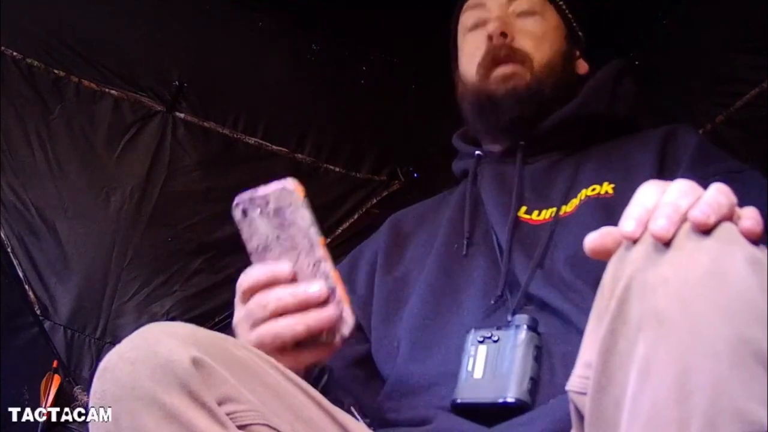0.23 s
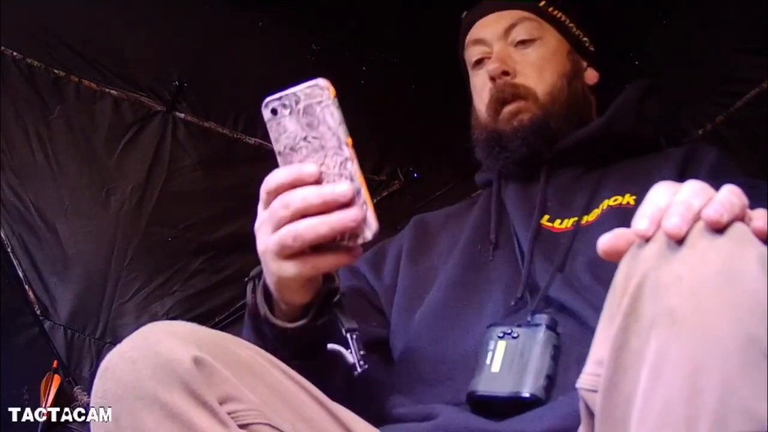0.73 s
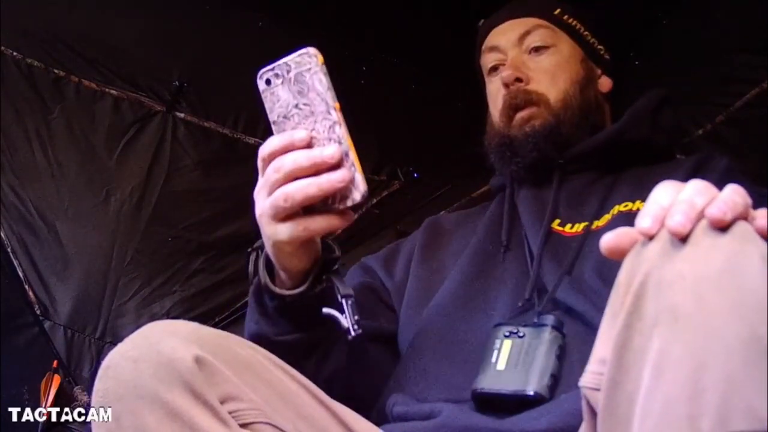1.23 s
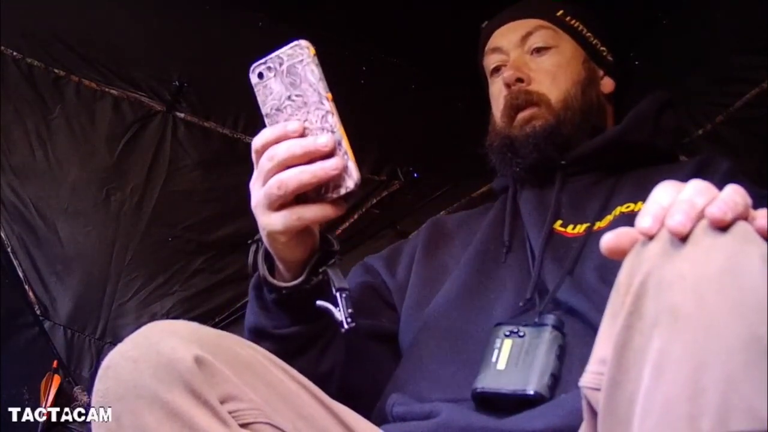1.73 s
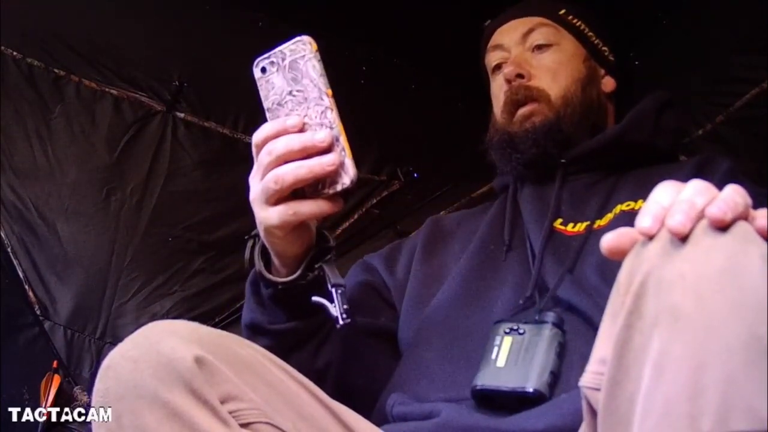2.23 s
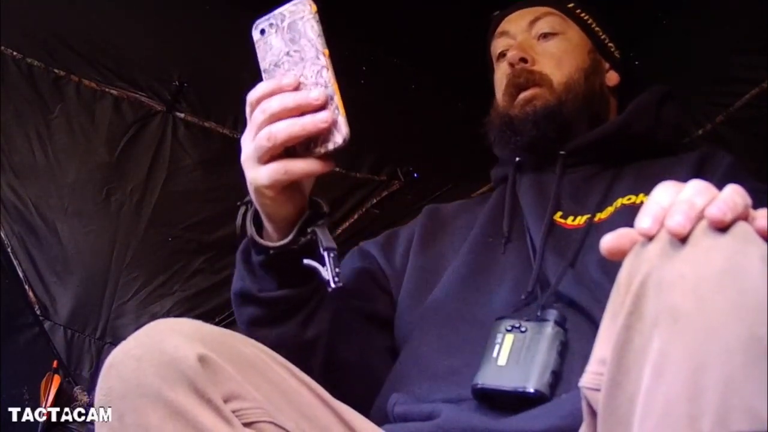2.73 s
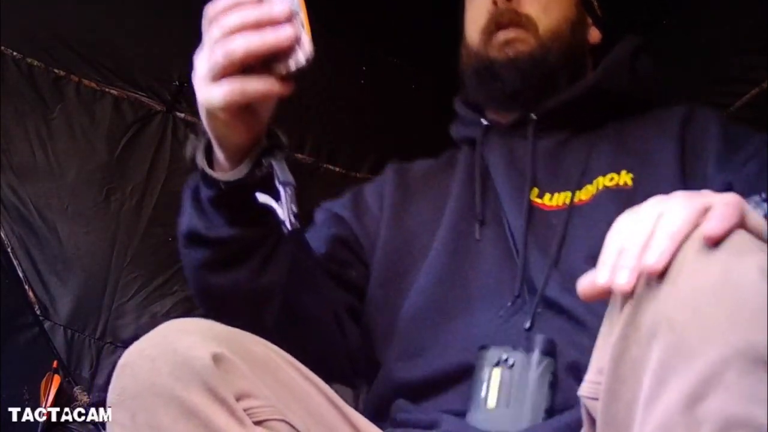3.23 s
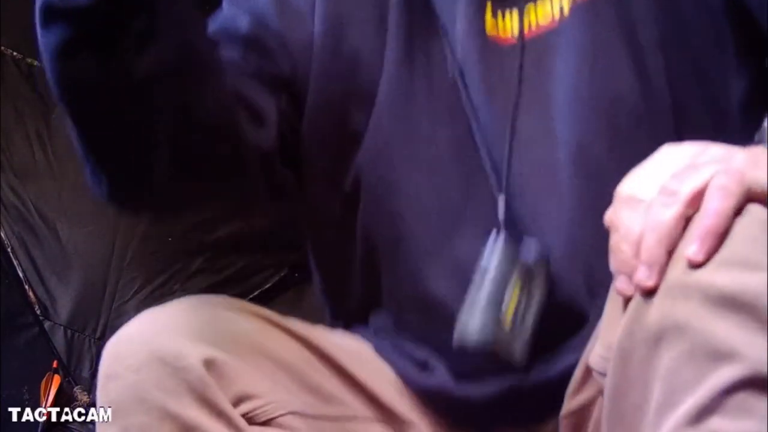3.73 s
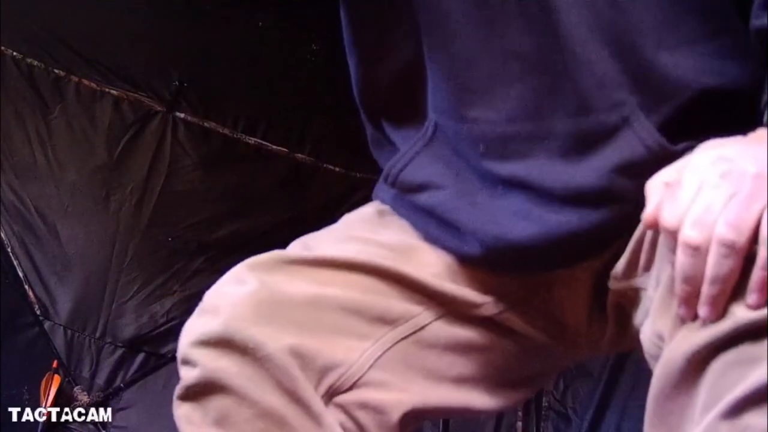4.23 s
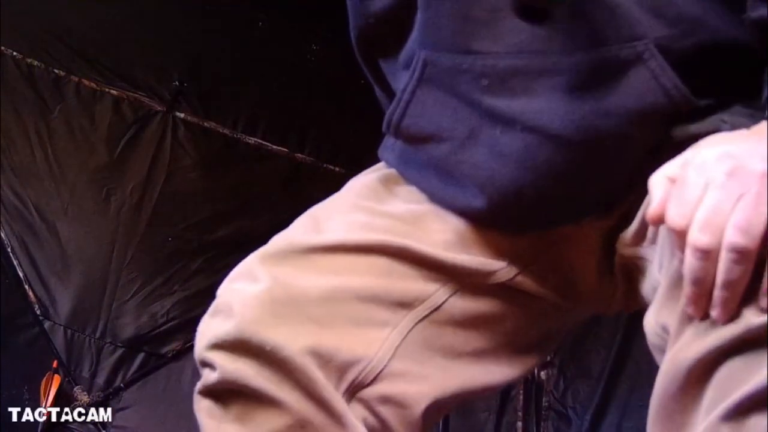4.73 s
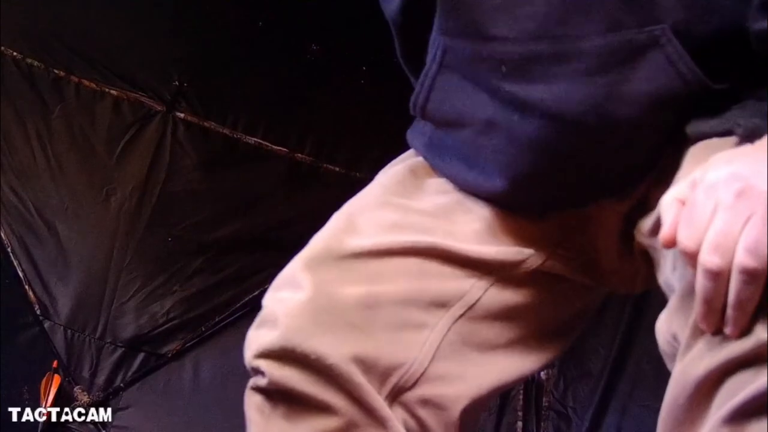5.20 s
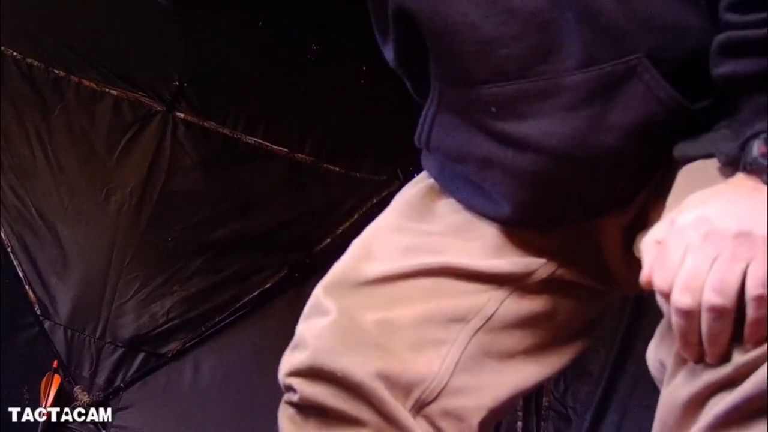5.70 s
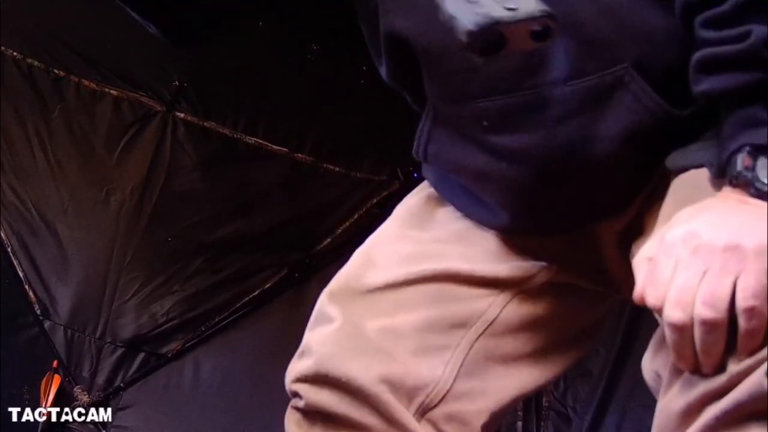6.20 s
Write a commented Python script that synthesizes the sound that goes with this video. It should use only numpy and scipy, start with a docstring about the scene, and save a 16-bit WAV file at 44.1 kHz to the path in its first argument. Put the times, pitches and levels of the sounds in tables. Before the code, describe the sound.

Soft low wingbeat thuds and feathery swishes come about four a second, then thin out, over low cloth rumble and faint hiss.

```python
"""Large bird flopping on the ground

A large bird flops some way off, heard from inside a cloth hunting blind.
Each wing beat mixes low pushes of air and quick feather flutters, made of short swings of pressure.
Shaped noise adds the rustle of leaves and plumage, the wind rumbling in the cloth and the microphone hiss.
A small metal part clicks once, made of a noise scrape and ringing tones; a far bird peeps in short tones.
Once, the sound fades out, skips back and repeats its last moment."""
import sys
import numpy as np
from scipy import signal
from scipy.fft import rfft, irfft, next_fast_len
from scipy.io import wavfile
from scipy.ndimage import uniform_filter1d, map_coordinates

SR = 44100
rng = np.random.default_rng(int(sys.argv[2]) if len(sys.argv) > 2 else 0)


def amp(db):
    return 10 ** (np.asarray(db, float) / 20)


def to_wav(s):
    """Save 16-bit WAV."""
    ch = np.atleast_2d(s).T  # columns
    pcm = np.round(np.clip(ch, -1, 1) * 32767)  # PCM
    wavfile.write(sys.argv[1], SR, pcm.astype(np.int16))


N = 284886  # length of the scene [samples]


def unit(x):
    """Scales a sound to an rms of 1."""
    return x / np.sqrt(np.mean(x ** 2) + 1e-20)


def wobble(rate):
    """A smooth random curve that takes a new random value rate times a second."""
    knots = rng.standard_normal(int(N * rate / SR) + 4)
    return map_coordinates(knots, [np.arange(N) * rate / SR])


def noise(spectrum, patchy_db, tilt_db=0):
    """Coloured noise of rms 1 with patches of random gain, tilted per octave about 3 kHz."""
    _, _, z = signal.stft(rng.standard_normal(N + 512), SR, nperseg=512)
    patches = uniform_filter1d(rng.standard_normal(z.shape), size=5, axis=0)
    patches = uniform_filter1d(patches, size=6, axis=1)
    patchy = signal.istft(z * amp(patchy_db * unit(patches)), nperseg=512)[1][:N]
    m = next_fast_len(N + 8192)
    hz = np.fft.rfftfreq(m, 1 / SR) + 1  # the 1 avoids log(0)
    table_hz, table_db = np.transpose(spectrum)
    colour_db = np.interp(np.log(hz), np.log(table_hz), table_db, left=-120)
    colour_db = colour_db + tilt_db * np.log2(hz / 3000)
    return unit(irfft(rfft(patchy, m) * amp(colour_db), m)[:N])


def swings(rows, glide, rough, edge):
    """Short swings of pressure whose pitch glides and wanders; also returns their joint power outline."""
    out, outline = np.zeros(N + SR), np.zeros(N + SR)
    t = np.arange(-SR // 4, SR // 4) / SR
    luck = rng.standard_normal((len(rows), 3))
    for (centre_s, db, hz, ms), (phase, drift, wander) in zip(rows, luck):
        u = t / (ms / 2000)  # -1 and 1 where the bell is at half height
        bell = amp(db) * 0.5 ** (np.abs(u) ** edge)
        turns = hz * t * (1 + glide * np.tanh(u / 2))
        turns = turns + rough * wander * np.sin(2 * u + 2 * drift)
        start = round(centre_s * SR)
        # a swing tends to peak as a push, with suction before and after
        out[start:][:len(t)] += bell * np.cos(2 * np.pi * turns + 0.55 * phase)
        outline[start:][:len(t)] += bell ** 2
    # each swing was placed a quarter second late, to leave room before its centre
    return out[SR // 4:][:N], outline[SR // 4:][:N]


# How the background rises and falls:
# (time [s], rumble level [dB], stirred leaves level before a 4 dB cut [dB])
BACKGROUND = [(0.0, -43, -55.5), (0.6, -42.5, -61.5), (1.3, -43.5, -58.5), (1.75, -42.5, -54),
              (2.32, -42, -60.5), (2.9, -41, -50), (3.74, -42, -50), (4.21, -43.5, -58.5),
              (4.89, -42, -54.5), (5.22, -44.5, -59.5), (6.3, -41, -51.5), (6.46, -42.5, -53.5)]
# Colours of the wind rumble, the stirred leaves and the hiss:
# (frequency [Hz], relative level per hertz [dB])
RUMBLE_COLOUR = [(15, -37), (25, 1), (65, 1), (150, -3.5), (310, -9), (430, -16.5), (600, -21.5),
                 (1000, -28.5), (2000, -69)]
LEAVES_COLOUR = [(300, -14), (600, 6.5), (850, -8), (1250, 3), (1700, -4), (2300, 0), (5000, -9.5),
                 (8000, -17), (16000, -50)]
HISS_COLOUR = [(300, -12), (1000, -1.5), (1650, -5.5), (2400, -7), (4300, -8.5), (11000, -7), (16000, -8.5)]


def background():
    """Lumpy wind rumble in the cloth, leaves stirring and microphone hiss at an even level."""
    s, rumble_db, leaves_db = np.transpose(BACKGROUND)
    t = np.arange(N) / SR
    lumps_db = 0.8 * wobble(9) + 1.4 * wobble(40)
    rumble = amp(np.interp(t, s, rumble_db) + lumps_db) * noise(RUMBLE_COLOUR, patchy_db=0.6)
    stir_db = np.interp(t, s, leaves_db) - 4 + 0.7 * wobble(17)
    leaves = amp(stir_db) * noise(LEAVES_COLOUR, patchy_db=2.0)
    hiss = amp(-58) * noise(HISS_COLOUR, patchy_db=2.0)
    return rumble + leaves + hiss


# Far peeps and faint whistles:
# (time of centre [s], level of the bell's top [dB], base pitch [Hz], length at half height [ms])
PEEP_TONES = [(0.716, -56, 1995, 40), (1.0, -55, 2010, 10), (3.52, -62, 1380, 280), (3.45, -65, 3380, 260)]


def peeps():
    """A far bird's peeps and faint whistles: short tones that swell and fade, their pitch wandering."""
    return swings(PEEP_TONES, glide=0.001, rough=0.12, edge=2.5)[0]


# Tones of the metal part: (frequency [Hz], relative level [dB], time to fall by 60 dB [s])
METAL_TONES = [(2440, 0, .014), (5136, -1, .018), (6480, -3, .018), (8263, 0, .045), (9028, -7, .03),
               (11080, -8, .03)]
# When it clicks: (time [s], level shared by scrape and ring before their own gains [dB])
CLICK_MOMENT = (3.298, -37)


def click():
    """A short noise scrape sets a small metal part ringing in dying tones."""
    s, db = CLICK_MOMENT
    t = np.arange(SR // 5) / SR
    scrape_shape = (t / 0.0083) * (np.exp(-(t / 0.0093) ** 3) + 0.079 * np.exp(-t / 0.016))
    scrape = rng.standard_normal(len(t)) * scrape_shape
    tones = sum(amp(level - 60 * t / t60) * np.sin(2 * np.pi * hz * t) for hz, level, t60 in METAL_TONES)
    ring = signal.fftconvolve(scrape, tones)[:len(t)]
    band = signal.butter(3, [1900, 10000], "bandpass", fs=SR, output="sos")
    bare_scrape = signal.sosfilt(band, scrape)
    out = np.zeros(N)
    out[round(s * SR):][:len(t)] = amp(db) * (amp(-21.0) * ring + amp(12.5) * bare_scrape)
    return out


# Colour of leaves and plumage before tilting: (frequency [Hz], relative level per hertz [dB])
PLUMAGE_COLOUR = [(350, -24), (600, -8.5), (850, -7), (1250, -0.5), (1750, -5.5), (2400, 1), (5000, -5),
                  (8000, -13.5), (16000, -31.5)]
# Feather flutters, played by beat_rows() below, each with the rustle that follows it:
# (time of flutter centre [s], level of its bell's top [dB], base pitch [Hz], length at half height [ms],
#  rustle level before shaping and a 7.5 dB cut [dB], time for the rustle's fast fall by 60 dB [s])
FLUTTERS = [(.179, -34.5, 278, 9.7, -62.5, .15), (.303, -30.5, 233, 10, -57.5, .15),
            (.482, -37, 205, 7.4, -56, .1), (.51, -14.5, 228, 8.7, -47.5, 0.17),
            (.561, -28.5, 267, 16.5, -49.5, 0.26), (.811, -18, 277.6, 13.1, -44.5, 0.13),
            (1.066, -30.5, 240, 12.6, -53.5, 0.18), (1.108, -22.5, 301, 10.7, -46, 0.071),
            (1.371, -31.5, 292, 11, -47.5, 0.1), (1.424, -25.5, 269, 13.7, -46, .24),
            (1.628, -31, 218, 9.5, -62, .15), (1.685, -25.5, 308, 10, -46, 0.21),
            (1.937, -18.5, 228, 18.8, -45, 0.16), (2.226, -21, 268, 7.1, -52, 0.17),
            (2.256, -28.5, 298, 14, -53, .12), (2.476, -30.5, 300, 15, -48.5, .09),
            (2.539, -23.5, 300, 9.2, -50.5, .17), (2.765, -22, 265, 13.4, -53, .15),
            (2.792, -20.5, 299, 11.2, -41.5, 0.24), (3.038, -16, 264, 12.6, -41.5, 0.12),
            (3.266, -31, 250, 8.6, -46.5, 0.31), (3.339, -21.5, 318, 13.5, -46, 0.28),
            (3.583, -25, 230, 9.5, -53, 0.15), (3.602, -20.5, 262, 11, -41.5, 0.31),
            (3.807, -27.5, 287, 12, -53.5, 0.19), (3.866, -25.5, 270, 11.06, -51.5, 0.16),
            (4.173, -33, 276, 12.7, -55, 0.16), (4.401, -35, 243, 8.3, -65, .15),
            (4.426, -20, 290, 10, -52.5, 0.18), (4.486, -31, 225, 11, -56.5, .15),
            (4.707, -23, 260, 12.2, -55, .15), (4.754, -21.5, 336, 10.4, -43, 0.12),
            (4.983, -17, 295, 14.2, -41, .08), (5.234, -34.5, 304, 8, -66, .15),
            (5.656, -33.5, 295, 8.8, -51, 0.089), (6.01, -26, 263, 12.4, -48.5, 0.3),
            (6.066, -30, 298, 13, -50.5, 0.15), (6.322, -27, 230, 18.7, -48.5, .28)]


def rustle():
    """Leaves and plumage: a faint lead-in, a sharp swell, a short hold, a fast fall and a slower settling."""
    lag_s = 0.011  # behind the flutter
    t = np.arange(N) / SR
    dull_power, bright_power = np.zeros(N), np.zeros(N)
    luck = rng.standard_normal(len(FLUTTERS))
    for (flutter_s, *_, db, t60), chance in zip(FLUTTERS, luck):
        s = flutter_s + lag_s
        # louder rustles are brighter, with some scatter
        bright_db = -1 + 0.06 * (db + 48) + 1.3 * chance
        age = np.abs(t - s)
        held = np.sqrt(age ** 2 + 0.008 ** 2) - 0.008  # rounds off the start of the fall
        fall = amp(-60 * held / abs(t60)) + amp(-5) * amp(-60 * age / 0.91)
        rise = 1.1 * np.exp(-(age / 0.018) ** 3) + 0.54 * np.exp(-age / 0.05)
        power = (amp(db) * np.where(t > s, fall, rise)) ** 2
        # these are powers, so decibels count double inside amp()
        dull_power += power * amp(-2 * bright_db)
        # the treble dies sooner
        bright_power += power * amp(2 * bright_db + 2.5 - 120 * age * (t > s) / 1.34)
    # single feathers and leaves crackle inside the swish
    crackle = amp(0.3 * wobble(90) + 1.5 * wobble(450))
    dull = np.sqrt(dull_power) * noise(PLUMAGE_COLOUR, patchy_db=2.0, tilt_db=-5.0)
    bright = np.sqrt(bright_power) * noise(PLUMAGE_COLOUR, patchy_db=2.0, tilt_db=4.0)
    return crackle * (dull + bright) * amp(-7.5)


# Low pushes of air from the downstroke:
# (time of centre [s], level of the bell's top [dB], base pitch [Hz])
AIR_PUSHES = [(0.483, -38, 104), (.513, -12, 127), (0.814, -16.5, 124), (1.067, -30, 82), (1.102, -25, 131),
              (1.37, -23.5, 96), (1.616, -28, 144), (1.929, -29, 115), (2.229, -25.5, 139),
              (2.478, -26, 90), (2.532, -25, 141), (2.768, -16.5, 102), (2.792, -23.5, 95),
              (3.038, -16.5, 104), (3.272, -23, 122), (3.571, -23.5, 111), (3.6, -28, 95), (3.82, -26, 91),
              (3.864, -28, 95), (4.403, -25, 113), (4.416, -21, 92), (4.71, -17, 89.5), (4.751, -25, 111),
              (4.985, -12, 110), (6.007, -23, 108), (6.068, -29.5, 129), (6.323, -27, 131)]


def beat_rows():
    """Lists the air pushes, the flutters and a loose feather's slap near each flutter, for swings()."""
    push_cycles = 1.26  # length of a push at half height
    push_s, push_db, push_hz = np.transpose(AIR_PUSHES)
    pushes = [push_s, push_db, push_hz, push_cycles / push_hz * 1000]
    s, db, hz, ms = np.transpose(FLUTTERS)[:4]
    luck = rng.standard_normal((2, len(s)))
    # the slap usually comes about 0.8 flutter lengths early; it is shorter and lower in pitch
    slap_s = s + (0.15 * luck[0] - 0.8) * ms / 1000
    slap_db = db - 3.5 + 2 * luck[1]
    slaps = [slap_s, slap_db, 0.75 * hz, 0.49 * ms]
    return np.hstack([pushes, [s, db, hz, ms], slaps]).T


# Colours of the churned air and the slow heave: (frequency [Hz], relative level per hertz [dB])
CHURN_COLOUR = [(20, 6), (45, -5.5), (180, 6), (420, -2), (560, -15), (750, -35.5), (1200, -62)]
HEAVE_COLOUR = [(15, -3), (30, 9), (70, 5.5), (110, -11), (200, -47)]


def wings():
    """Wing beats press on the air, churn it and heave it slowly; ground and trees answer dully."""
    beats, outline = swings(beat_rows(), glide=0.11, rough=0.13, edge=2.4)
    churn = amp(-8.0) * np.sqrt(outline) * noise(CHURN_COLOUR, patchy_db=-1.1)
    # smoothing spreads the heave over the whole stroke
    stroke = np.abs(uniform_filter1d(uniform_filter1d(outline, size=900), size=900))
    heave = amp(-13.0) * np.sqrt(stroke) * noise(HEAVE_COLOUR, patchy_db=3.5)
    direct = beats + churn + heave
    t = np.arange(SR // 3) / SR
    # the answer is a dying noise tail that starts after 8 ms
    tail = rng.standard_normal(len(t)) * amp(-60 * t / 0.17) * (t > 0.008)
    answer = signal.fftconvolve(direct, tail / np.linalg.norm(tail))[:N]
    return direct + amp(-11.0) * answer


def scene():
    """Adds up everything that reaches the one microphone."""
    return (background() + peeps() + click() + rustle() + wings())[None]


# The skip back: (time [s], length heard twice [s], fade setting [s])
SKIP_BACK = (5.716, 0.13333, 0.026)


def skip(x):
    """The sound fades out, jumps back and plays its last moment again, then blends into what follows."""
    at, back, fade = (round(v * SR) for v in SKIP_BACK)
    k = np.arange(N)
    blend = np.pi / 2 * (k >= at) * np.clip((at + back - k) / fade, 0, 1)
    x = np.cos(blend) * x + np.sin(blend) * np.roll(x, back, axis=1)
    dip = (np.abs(k - at) / fade) ** 0.84 + 0.078 * (k >= at)
    return x * np.clip(dip, 0, 1)


def top_cut(x):
    """Nothing passes above the cut-off."""
    return signal.sosfilt(signal.butter(12, 16180, fs=SR, output="sos"), x)


def record(dry):
    """Skips back once and removes everything from 15.8 kHz up."""
    skipped = skip(dry)
    below_limit = np.fft.rfftfreq(N, 1 / SR) < 15800
    mix = irfft(rfft(skipped) * below_limit, N)
    return top_cut(mix)


dry = scene()
out = record(dry)
to_wav(out)
```